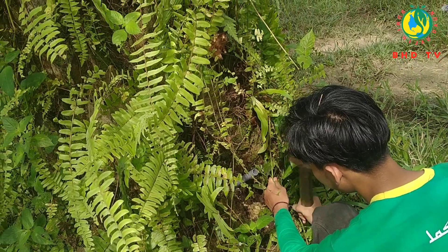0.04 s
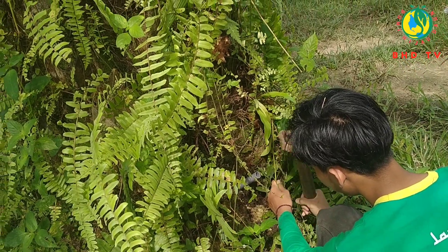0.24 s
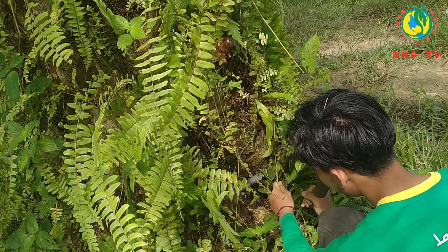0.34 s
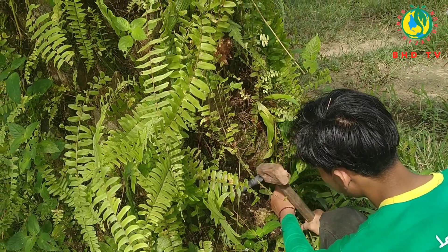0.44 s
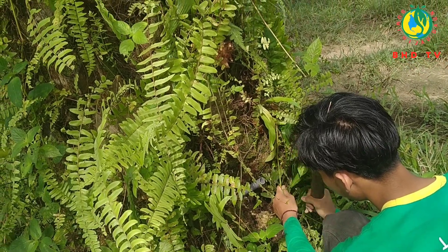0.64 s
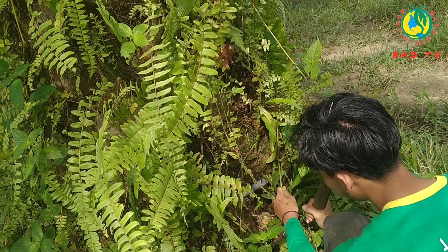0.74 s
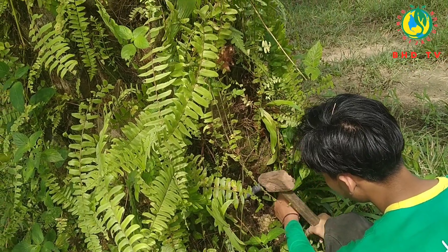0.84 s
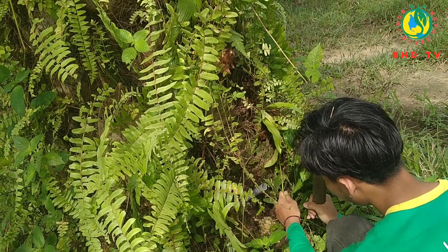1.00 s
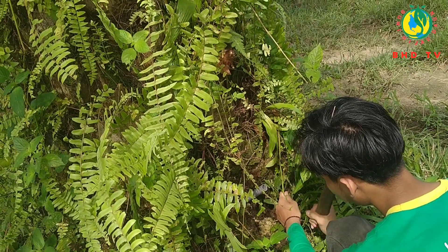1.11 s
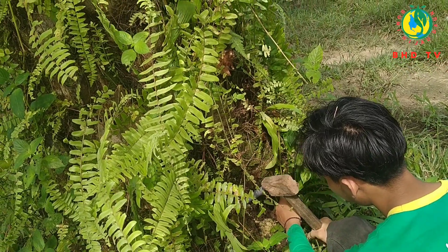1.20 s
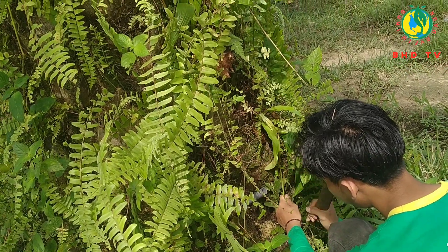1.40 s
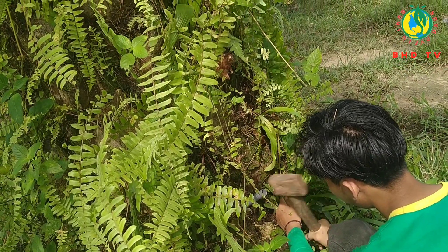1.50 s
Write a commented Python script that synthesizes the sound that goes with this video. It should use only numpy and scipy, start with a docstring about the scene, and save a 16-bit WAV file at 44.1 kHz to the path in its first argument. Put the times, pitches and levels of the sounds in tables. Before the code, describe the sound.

A hammer knocks a plastic pipe into a palm trunk with four steady blows, at about 0.2, 0.6, 0.95 and 1.3 seconds. Each is a short, hollow, damped clack with a slightly later low woody thud, scattering briefly off ferns and trunks. A small rustling tick follows the third near 1.03. Faint high insect shrilling, rapid cricket pulses and soft airy hush run throughout, outdoors and fairly close.

```python
"""Outdoors on a plantation, a hammer knocks a plastic pipe into a palm trunk with four steady blows.
Each blow is a short clack from the pipe's damped modes and a low thud from the trunk's swelling modes.
Decaying noise scatters it off ferns and farther palms, and small noise bursts tick in the growth.
A fluttering noise chorus and a pulsed cricket tone shrill faintly over a low hush and hiss of shaped noise."""
import sys
import numpy as np
from scipy import signal
from scipy.fft import rfft, irfft
from scipy.io import wavfile

SR = 44100
rng = np.random.default_rng(int(sys.argv[2]) if len(sys.argv) > 2 else 0)


def store_wav(level_fs):
    """Save 16-bit WAV to argv[1]."""
    pcm = np.round(np.clip(np.atleast_2d(level_fs), -1, 1) * 32767)
    wavfile.write(sys.argv[1], SR, pcm.T.astype(np.int16))


N = 68355
TIME = np.arange(N) / SR  # seconds


def from_db(db):
    """Turns decibels into an amplitude factor."""
    return 10 ** (np.asarray(db) / 20)


def rms_one(x):
    """Scales a sound to an RMS of 1."""
    return x / np.sqrt(np.mean(x ** 2) + 1e-20)


def fade(t60):
    """Exponential decay that falls 60 dB in t60 seconds, down to a floor of -240 dB."""
    return from_db(-60 * np.minimum(TIME / t60, 4))


def delayed(x, seconds):
    """Starts a sound later and trims it to the length of the scene."""
    lag = max(int(round(seconds * SR)), 0)
    return np.concatenate([np.zeros(lag), x])[:N]


def coloured(x, points):
    """Shapes a spectrum by a (Hz, dB) curve, drawn straight over log frequency."""
    hz, db = np.transpose(points)
    bins_hz = np.maximum(np.arange(N // 2 + 1) * SR / N, 1)
    gain_db = np.interp(np.log(bins_hz), np.log(hz), db)
    return irfft(rfft(x) * from_db(gain_db), N)


def level_over_time(points):
    """Amplitude envelope through (s, dB) points."""
    return from_db(np.interp(TIME, *np.transpose(points)))


def drift(cutoff_hz):
    """Random wander with an RMS of 1: noise low-passed at cutoff_hz, taken after the filter settles."""
    sos = signal.butter(2, cutoff_hz, fs=SR, output="sos")
    return rms_one(signal.sosfilt(sos, rng.standard_normal(2 * N))[N:])


def filtered(x, hz, kind):
    """Second-order low-pass or high-pass."""
    sos = signal.butter(2, min(hz, .45 * SR), kind, fs=SR, output="sos")
    return signal.sosfilt(sos, x + 1e-18)


def resonance(x, hz, q):
    """Passes a narrow band around hz."""
    return signal.lfilter(*signal.iirpeak(hz, q, fs=SR), x + 1e-18)


def burst(envelope):
    """Noise under an envelope, with unit energy."""
    x = rng.standard_normal(N) * envelope
    return x / np.sqrt(np.sum(x ** 2))


def air():
    """Outdoor air as two shaped noises: a low hush, and a soft mid-range hiss that comes and goes."""
    # Spectrum of the hush. Each row: frequency in Hz, relative density in dB per Hz.
    hush_colour = [(25, -37.5), (55, -9), (85, -2), (140, 2.5), (220, 0), (340, -0.5), (480, -6.5),
                   (700, -14.5), (1200, -16), (1900, -12), (2700, -20), (4200, -30), (6000, -36),
                   (15000, -41.5)]
    # Level of the hush. Each row: time in seconds, level in dB.
    hush_level = [(0, -64), (.18, -62.5), (.35, -68), (.52, -68), (.72, -65), (.88, -66), (1.08, -65.5),
                  (1.25, -68.5), (1.45, -60.5), (1.55, -66.5)]
    # Spectrum of the hiss. Each row: frequency in Hz, relative density in dB per Hz.
    hiss_colour = [(500, -17.5), (1200, -11.5), (1900, 0), (2700, -1.5), (3300, -12), (4000, -24)]
    # Level of the hiss. Each row: time in seconds, level in dB.
    hiss_level = [(0, -70), (.18, -70.5), (.35, -67), (.5, -83), (.75, -74.5), (.87, -74), (1.2, -73),
                  (1.55, -67.5)]
    hush = rms_one(coloured(rng.standard_normal(N), hush_colour))
    hiss = rms_one(coloured(rng.standard_normal(N), hiss_colour))
    return level_over_time(hush_level) * hush + level_over_time(hiss_level) * hiss


def insect_chorus():
    """Many insects blur into a noise of high bands whose level flutters at random."""
    # Spectrum of the chorus. Each row: frequency in Hz, relative density in dB per Hz.
    chorus_colour = [(2650, -70.5), (4500, -38), (5720, -22.5), (6450, -32), (7280, -1.5), (7830, -1),
                     (8300, -2.5), (8520, -14.5), (8830, -20.5), (9650, -34), (10200, -38), (11000, -25.5),
                     (11900, -38), (13000, -40.5), (14200, -11.5), (14700, -2), (15700, -8.5)]
    level_db, flutter_db, flutter_cutoff_hz = -56, 0.7, 58
    chorus = rms_one(coloured(rng.standard_normal(N), chorus_colour))
    return from_db(level_db) * chorus * from_db(flutter_db * drift(flutter_cutoff_hz))


def cricket():
    """One cricket: short pulsed chirps of an unsteady high tone with a narrow noisy scrape under it."""
    # Chirps of the cricket. Each row: start in seconds, level in dB over the tone and scrape levels.
    chirp_starts = [(.042, 4), (0.088, 0), (.149, 3), (0.195, 5), (0.25, 5), (0.294, 0.5), (0.339, -0.5),
                    (0.387, 1), (.436, 2), (.496, 3), (0.544, -3.5), (0.589, 5), (0.639, 0), (0.687, -1),
                    (0.731, -0.5), (.783, 0.5), (.83, 0), (.872, 1.5), (0.919, 3.5), (0.968, 7),
                    (1.024, -1.5), (1.062, 1.5), (1.113, -0.5), (1.169, 0.5), (1.218, -1.5), (1.263, 0.5),
                    (1.312, 9.5), (1.356, -2), (1.4, -1), (1.448, 1), (1.497, -5)]
    chirp_s, pulses_per_s, pulse_depth = .028, 90, 0.58
    tone_hz, tone_wander_hz, tone_db = 8030, 28, -55
    scrape_hz, scrape_q, scrape_db = 7430, 15, -61.5
    swell = np.sin(np.pi * np.minimum(TIME / chirp_s, 1)) ** 2
    chirp = swell * (1 + pulse_depth * np.cos(2 * np.pi * pulses_per_s * TIME))
    chirps = sum(from_db(db) * delayed(chirp, start) for start, db in chirp_starts)
    pitch_hz = tone_hz + tone_wander_hz * drift(150)
    tone = np.sin(2 * np.pi * np.cumsum(pitch_hz) / SR)
    scrape = resonance(rng.standard_normal(N), scrape_hz, scrape_q)
    scrape = rms_one(resonance(scrape, scrape_hz, scrape_q))
    return chirps * (from_db(tone_db) * tone + from_db(scrape_db) * scrape)


def pipe(pitch, contact_hz, accent_hz, accent_db, gap_hz, gap_db):
    """One clack: damped modes, dulled by the contact; where the hammer lands favours one band, misses another."""
    # Modes of the pipe. Each row: frequency in Hz before the pitch ratio, relative level in dB, t60 in seconds.
    pipe_modes = [(347, -11.5, 0.084), (613, -14, 0.017), (872, -11, 0.014), (1184, -28, 0.03),
                  (1422, -15.5, 0.028), (1611, -20, 0.036), (1762, -6.5, 0.0081), (2189, -18.5, 0.013),
                  (2487, -11.5, 0.017), (3090, -35, 0.016), (3777, -15, 0.0086), (4000, -31.5, 0.014),
                  (4560, -25, 0.0058)]
    # Rebounds of the hammer on the rim. Each row: delay in seconds, level in dB relative to the first hit.
    rebounds = [(.00091, 6.5), (.00196, -2), (.00271, -1.5)]
    crack_db, crack_t60_s, crack_low_hz = -38.5, 0.0067, 5500
    clack = 0
    for hz, db, t60 in pipe_modes:
        clack = clack + from_db(db) * fade(t60) * np.sin(2 * np.pi * hz * pitch * TIME)
    clack = filtered(clack, contact_hz, "low")
    clack = filtered(clack, 584, "high")  # the narrow pipe radiates little below this
    clack = clack + (from_db(accent_db) - 1) * resonance(clack, accent_hz, q=6.3)
    clack = clack + (from_db(gap_db) - 1) * resonance(clack, gap_hz, q=9.0)
    crack = filtered(rng.standard_normal(N), crack_low_hz, "high") * fade(crack_t60_s)
    clack = clack + from_db(crack_db) * crack
    return clack + sum(from_db(db) * delayed(clack, s) for s, db in rebounds)


def trunk(pitch, ring):
    """One thud: the fibrous wood takes up the blow over a few cycles, so its modes swell before they fade."""
    # Modes of the trunk. Each row: frequency in Hz before the pitch ratio, relative level in dB,
    # t60 of the exponential in seconds before the ring ratio.
    trunk_modes = [(137.3, -48, 0.095), (174, -43, 0.068), (233.3, -40, .07), (269.4, -32, 0.082),
                   (386.6, -32.5, 0.027), (532, -32, .021)]
    thud = 0
    for k, (hz, db, t60) in enumerate(trunk_modes):
        decay_s = t60 * ring
        swell = np.e * np.log(1000) * TIME / decay_s  # brings the peak of swell times fade to 1
        mode = swell * fade(decay_s) * np.sin(2 * np.pi * hz * pitch * TIME)
        thud = thud + (-1) ** k * from_db(db) * mode  # neighbouring modes have opposite sign
    return delayed(thud, .0053)  # the thud lags the clack


def plantation():
    """The answer to one blow: a quick dense scatter, a longer faint one and a few smeared echoes."""
    # Colour of the scatter from the ferns close by. Each row: frequency in Hz, relative gain in dB.
    near_colour = [(90, -19.5), (200, -2.5), (400, 5), (800, 1.5), (1600, 7), (2600, 3), (4200, -6),
                   (4800, -10.5), (5700, -22.5), (8500, -6.5), (11000, -35), (15000, -15.5)]
    # Colour of the scatter from the palms beyond. Each row: frequency in Hz, relative gain in dB.
    far_colour = [(90, -14.5), (170, -4), (280, 6.5), (500, -6.5), (900, -10.5), (1600, 2), (2600, -9),
                  (4500, -15), (5400, -28), (8500, -24), (14000, -33)]
    # Diffuse echoes from neighbouring trunks. Each row: delay in seconds, relative level in dB.
    trunk_echoes = [(.023, -5), (0.041, -14), (.078, -11.5)]
    # The trunks return mostly the middle range. Each row: frequency in Hz, relative gain in dB.
    echo_colour = [(100, -18), (300, 5.5), (600, -1.5), (1000, -3.5), (1600, 5), (2600, -7.5), (4200, -16),
                   (5700, -27), (12000, -38.5)]
    near_t60_s, near_rise_s = 0.15, 0.0013
    far_t60_s, far_rise_s = 0.36, 0.021
    echo_t60_s = 0.067
    clump_db, clump_cutoff_hz = 2, 130
    clumps = from_db(clump_db * drift(clump_cutoff_hz))  # the scatter arrives in clumps
    near_rise = 1 - np.exp(-(TIME / near_rise_s) ** 2)
    far_rise = 1 - np.exp(-(TIME / far_rise_s) ** 2)
    near = burst(clumps * fade(near_t60_s) * near_rise)
    far = burst(clumps * fade(far_t60_s) * far_rise)
    echoes = sum(from_db(db) * delayed(burst(fade(echo_t60_s)), s) for s, db in trunk_echoes)
    answer = coloured(near, near_colour) + coloured(far, far_colour) + coloured(echoes, echo_colour)
    return answer * (TIME < TIME[-1] / 2)  # drops anything the circular filter wraps to the end


def knocks():
    """Each blow sounds the pipe, then the trunk, and scatters through the growth."""
    # Hammer blows. Each row: start in seconds, pipe level in dB, trunk level in dB, scatter level in dB,
    # trunk pitch ratio, trunk ring ratio, pipe pitch ratio, contact low-pass in Hz,
    # accent in Hz, accent gain in dB, gap in Hz, gap gain in dB.
    blows = [(0.2207, -5.5, -3, 0, 0.98, 1.4, 0.97, 2704, 1580, 2, 1370, -8.5),
             (0.5808, -5, -3.5, 0.5, 1.0, 1.3, .986, 2600, 2490, 3.5, 1494, -3),
             (0.9438, -6.5, 0.5, .5, 0.997, 0.87, 1.004, 2308, 2115, 5, 711, -10.5),
             (1.3109, -4.5, 2.5, -.5, 1.013, 0.83, 1.0, 2187, 880, 0.5, 1250, -14)]
    out = 0
    for start, pipe_db, trunk_db, scatter_db, trunk_pitch, trunk_ring, *contact in blows:
        clack = from_db(pipe_db) * pipe(*contact)
        thud = from_db(trunk_db) * trunk(trunk_pitch, trunk_ring)
        scatter = from_db(scatter_db) * plantation()
        out = out + delayed(clack + thud + scatter, start)
    return out


def ticks():
    """Bits of bark and fern tick in the shaken growth: brief bands of fading noise."""
    # Ticks. Each row: start in seconds, level in dB, band centre in Hz, t60 in seconds.
    tick_rows = [(0.381, -73, 11000, .015), (.681, -69, 10000, .02), (1.033, -45.5, 2000, 0.063)]
    spread = 1.2  # band edges as a ratio to the centre
    out = 0
    for start, db, hz, t60 in tick_rows:
        band = filtered(rng.standard_normal(N), hz / spread, "high")
        band = filtered(band, hz * spread, "low")
        band = filtered(band, hz * spread, "low")  # a second pass steepens the upper edge
        out = out + from_db(db) * delayed(rms_one(band) * fade(t60), start)
    return out


def scene():
    """The blows and ticks over air and insects, in one channel."""
    background = air() + insect_chorus() + cricket()
    return (background + knocks() + ticks())[None]


def record(dry):
    """The microphone drops the deep bass, the highest peaks are rounded and the top is cut."""
    peak_limit, cutoff_hz = 0.8, 15700
    x = filtered(dry, hz=95, kind="high")
    x = x / (1 + (x / peak_limit) ** 6) ** (1 / 6)
    steep_low_pass = signal.ellip(12, .1, 80, cutoff_hz, fs=SR, output="sos")
    return signal.sosfilt(steep_low_pass, x)


dry = scene()
out = record(dry)
store_wav(out)
```